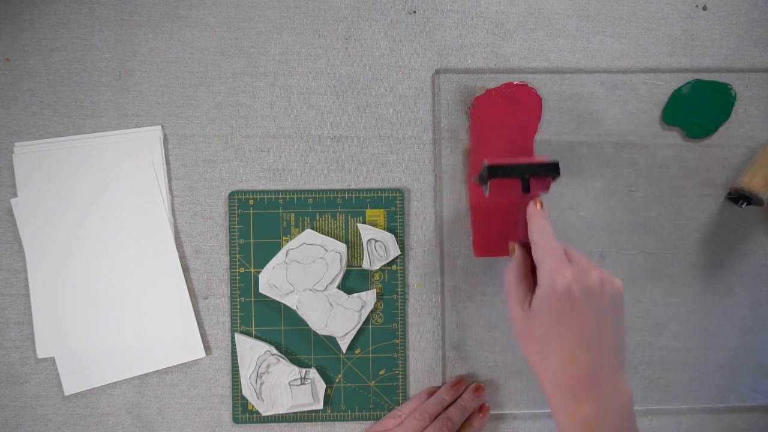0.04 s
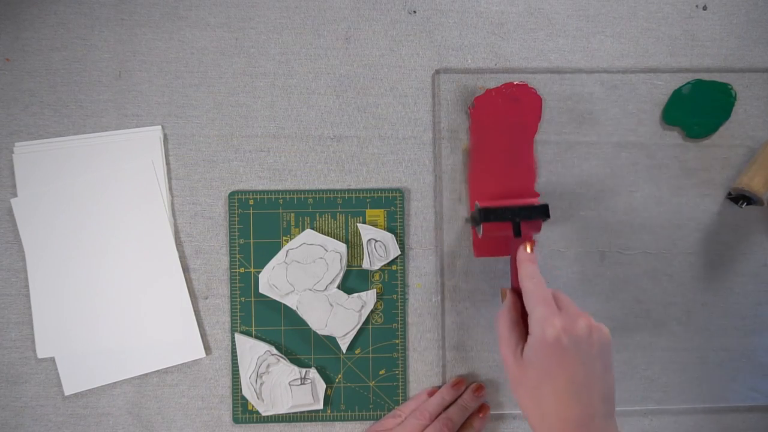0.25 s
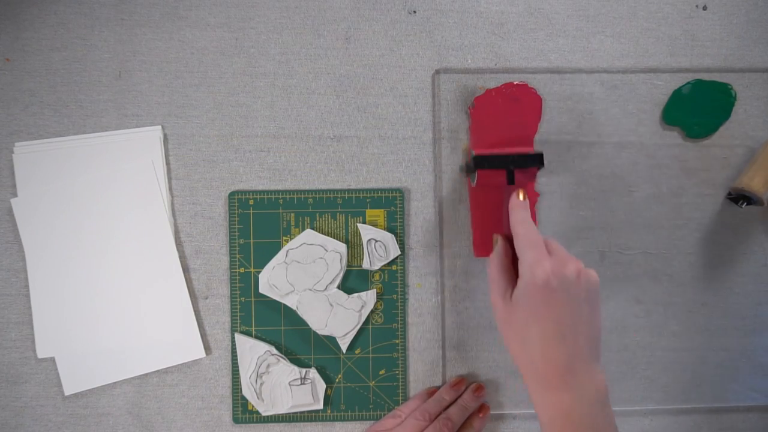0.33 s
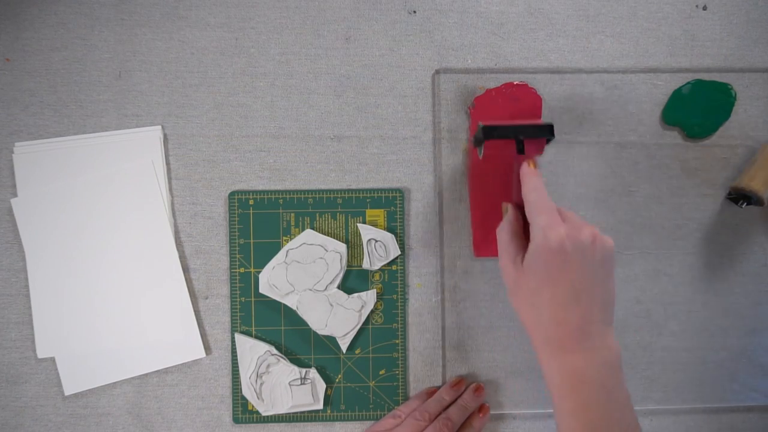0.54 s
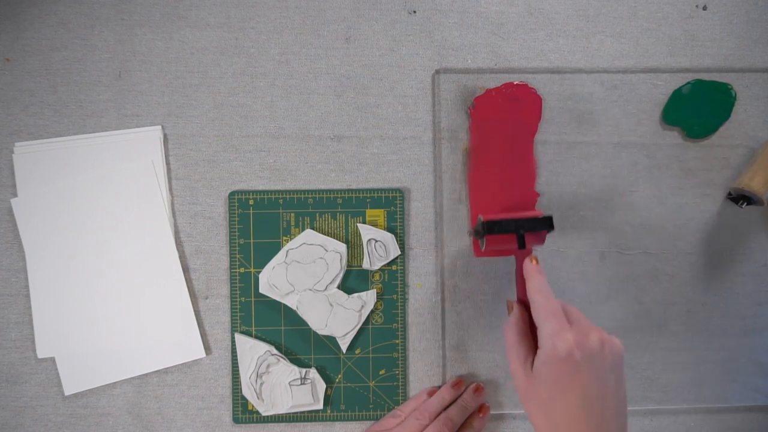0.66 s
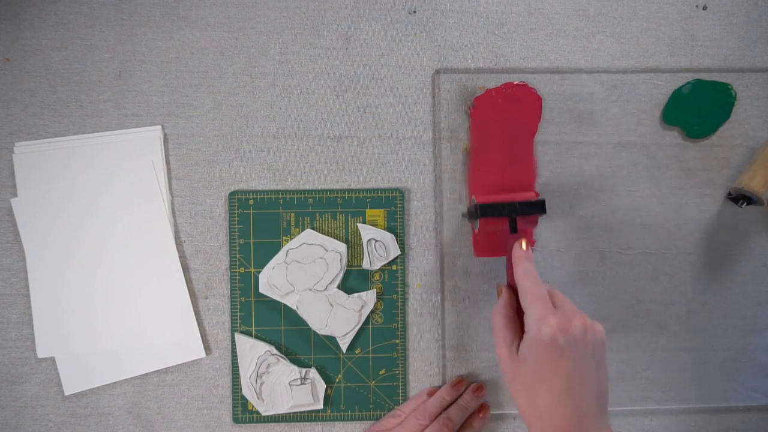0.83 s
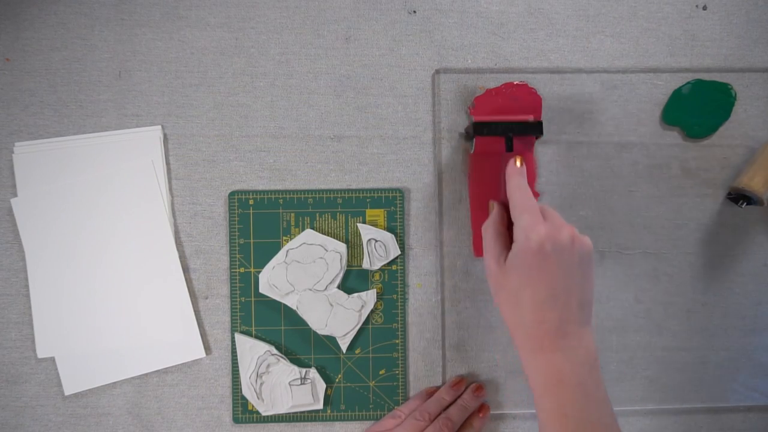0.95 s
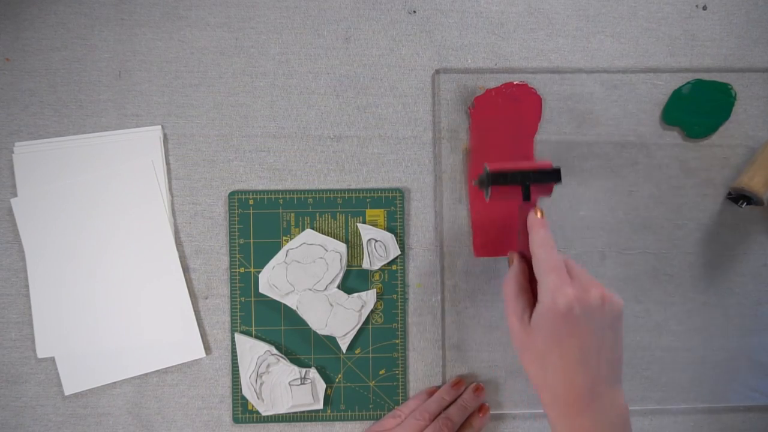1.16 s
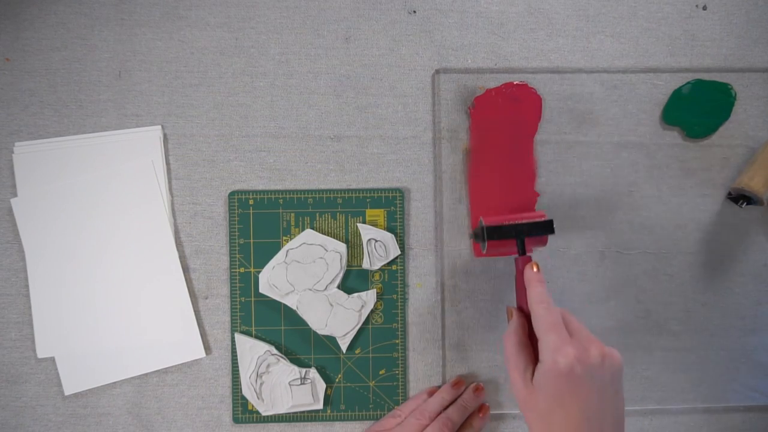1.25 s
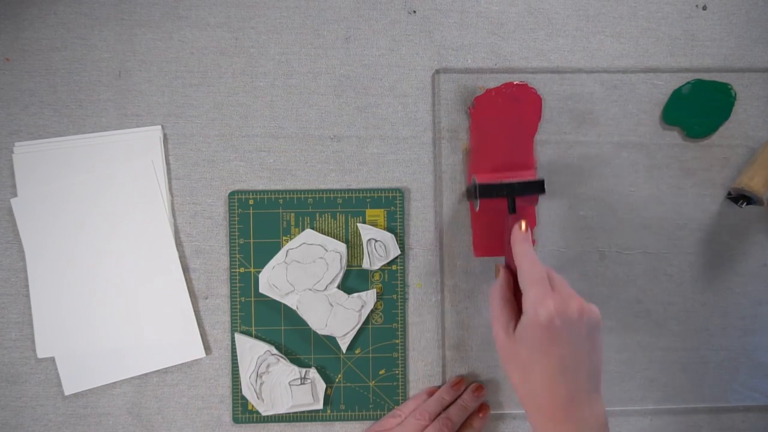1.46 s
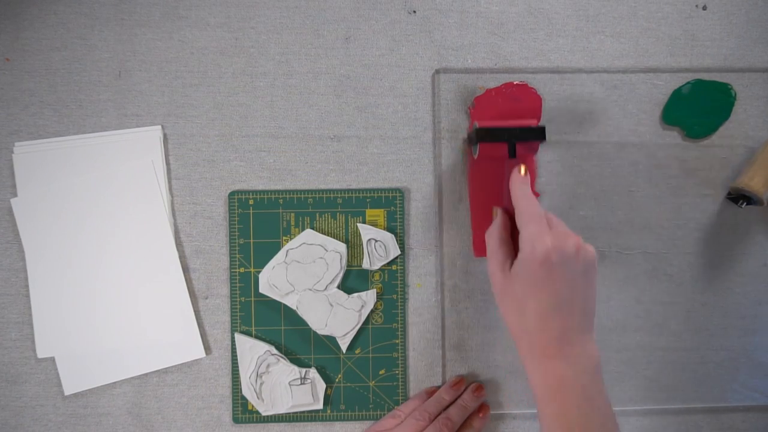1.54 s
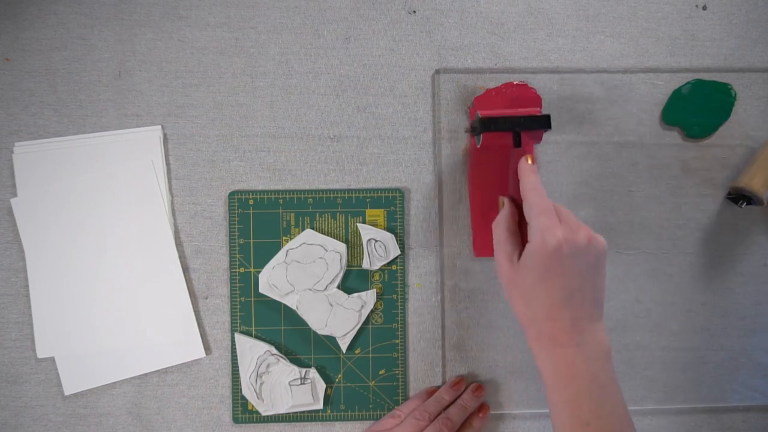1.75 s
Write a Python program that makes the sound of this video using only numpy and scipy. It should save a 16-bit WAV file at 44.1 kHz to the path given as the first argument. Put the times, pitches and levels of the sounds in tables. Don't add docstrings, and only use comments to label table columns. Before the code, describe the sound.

Three loud roller clacks with low table thuds, then short tacky ink crackle, in a quiet room.

```python
import sys
import numpy as np
from scipy import signal
from scipy.fft import rfft, irfft, next_fast_len
from scipy.io import wavfile
from scipy.ndimage import map_coordinates

SR = 44100
rng = np.random.default_rng(int(sys.argv[2]) if len(sys.argv) > 2 else 0)


def unload_wav(signal):
    wavfile.write(
        sys.argv[1],
        SR,
        np.round(np.clip(np.atleast_2d(signal).T, -1, 1) * 32767).astype(np.int16),
    )


def volts(x):
    e = np.asarray(x, float) / 20
    return 10 ** e


N = 79380
T = np.arange(N) / SR

# pitch_hz [Hz], level_db [dB]
AIR_SPECTRUM = [(25, -4), (52, 5), (65, 5.5), (85, -4), (260, -3), (335, -8.5), (1100, -18.5),
                (15400, -40.5)]
# pitch_hz [Hz], t60_s [s]
ROOM_DECAY = [(100, 0.067), (500, 0.5), (2000, 0.46), (6000, 0.4), (14000, 0.26)]
# pitch_hz [Hz], level_db [dB]
ROOM_COLOUR = [(100, -6), (500, -1), (2000, -3.5), (6000, -1.5), (14000, -9.5)]
# centre_s [s], half_length_s [s], level_db [dB]
SWISHES = [
    (0.123, 0.034, -59),
    (0.672, 0.034, -58),
    (1.248, 0.041, -55.5),
    (1.8, 0.023, -78.5),
]
# pitch_hz [Hz], level_db [dB]
CLOTH_SPECTRUM = [(470, -57.5), (800, -16.5), (970, -6.5), (1630, -13), (3410, -13), (12000, -26.5),
                  (15600, -61), (22000, -120)]
# centre_s [s], half_length_s [s], pitch_hz [Hz], width_hz [Hz], level_db [dB]
SQUEAK = (1.222, .011, 3350, 170, -59)
# start_s [s], thud_db [dB], push_s (softness of the push) [s], echo_db [dB], clack_db [dB]
LANDINGS = [
    (.2019, -11.5, 0.00052, 14, 0.5),
    (.7531, -22.5, .001, 13, -0.5),
    (1.3646, -15.5, 0.00049, 10, 0.5),
]
# pitch_hz [Hz], t60_s [s], level_db at each of three landing places [dB]
TABLE_MODES = [(80, 0.54, -9.5, -2, -9), (99.6, 0.5, -16.5, -2, -15.5), (137.5, 0.21, -3.5, 1.5, -15),
               (169, 0.17, 1.5, 6.5, -4), (212.3, 0.11, 0.5, -2, -3), (257.5, 0.32, -14, -9.5, -7.5),
               (299.2, 0.18, -18, -5.5, -2.5), (351, 0.085, -17.5, -3.5, 8.5), (378.7, 0.053, 3.5, 1, -24),
               (433.7, 0.09, 0.5, 1, -27), (517, 0.073, -5, 2, -24), (598.6, 0.2, -15, -8.5, -20.5),
               (658, 0.09, -60, -8, -8), (756, 0.015, -5, -23, -33)]
# pitch_hz [Hz], level_db [dB]
BOOMS = [
    [(60, -35.5), (150, -7), (300, -14), (480, 5), (640, -0.5), (760, -22.5), (1200, -59.5)],
    [(60, -29), (100, -8), (250, -14), (480, 17.5), (660, -6.5), (800, -27), (1200, -61)],
    [(60, -29), (100, -4), (200, -6), (300, -9), (450, -15), (760, -1), (1200, -62)],
]
# start_s [s], level_db [dB]
KNOCKS = [
    [(.2036, -1), (.20396, -4), (.20432, -7), (.2053, -13), (.2060, -7), (.2067, -14)],
    [(.7553, -2), (.7560, -7), (.7569, -1), (.7575, -5), (.7583, -9), (.7590, -9), (.7595, -7)],
    [(1.3671, -1), (1.36746, -4), (1.36782, -7), (1.3690, -14), (1.3703, -13), (1.3717, -18)],
]
# pitch_hz [Hz], width_hz [Hz], level_db at each landing [dB]
FRAME_MODES = [(4500, 370, -9, -15, -26), (5250, 620, -10, -5, 1), (5766, 440, -7.5, -4, 4),
               (6510, 510, -18, -7.5, -1), (6720, 190, -18.5, -5.5, 0.5), (8055, 470, 0, -4.5, 6.5),
               (8450, 500, -1.5, -3.5, 2.5), (9070, 480, -8.5, -5.5, 6), (10660, 610, -15.5, -11.5, -2),
               (12310, 3600, -18, -10.5, -1.5), (12500, 900, -15.5, -16.5, 5.5),
               (13350, 700, -13, -17.5, -9), (15300, 600, -16.5, -20, -4)]
# delay_s [s], level_db [dB]
WALLS = [(.0035, -28), (.007, -24), (0.0118, -28.5), (0.018, -32.5)]
# pitch_hz [Hz], width_hz [Hz], level_db [dB]
HANDLE_MODES = [
    [(900, 200, -24), (1300, 220, -2), (1500, 150, 2), (1923, 203.6, -2.5), (2300, 130, -8),
     (3020, 360, -5.5), (3900, 500, -26)],
    [(1500, 80, 2), (2006, 180, -6), (2640, 250, -8.5), (3550, 380, -5.5), (3790, 270, -0.5),
     (4180, 350, -6.5)],
    [(1280, 75, -3), (1600, 73, 3.5), (1843, 160, -1), (2450, 230, -3.5), (2900, 540, -5), (3320, 130, -10),
     (4000, 290, -13)],
]
HANDLE_DB = [-8.5, -3, -9]
# pitch_hz [Hz], level_db [dB]
ECHOES = [
    [(530, -38), (900, 3), (1100, -6), (1260, -10.5), (1450, -5), (3060, -15.5), (8680, -6), (14200, -15.5),
     (15800, -41)],
    [(530, -42), (900, -14), (1740, -6.5), (2240, -14.5), (4280, -3.5), (4710, -3.5), (7600, -13),
     (9100, -3.5), (15800, -22)],
    [(530, -42.5), (1760, -2.5), (2270, -18.5), (2880, -15), (5120, -4.5), (7160, -9.5), (8600, -1.5),
     (11500, -9.5), (15800, -25)],
]
# start_s [s], level_db [dB], landing place [index]
BUMPS = [(.226, -24, 0), (.286, -32, 0), (.332, -38, 0), (.797, -33, 1), (.838, -37, 1), (.885, -42, 1),
         (1.398, -28, 2), (1.42, -32, 2), (1.444, -36, 2), (1.493, -34, 2)]
# touch_s [s], full_speed_s [s], slowing_s [s], lifted_s [s], level_db [dB]
STROKES = [
    (0.318, 0.39, 0.48, 0.49, -46.5),
    (0.874, 0.989, 1.04, 1.067, -45.5),
    (1.455, 1.576, 1.66, 1.66, -46.5),
]
# pitch_hz [Hz], level_db [dB]
INK_SPECTRUM = [(1180, -34), (2000, -8.5), (2960, -11), (4610, -8), (7000, -6), (7980, 1.5), (10500, -6),
                (13800, 3.5), (16000, -4)]
# pitch_hz [Hz], level_db [dB]
RUMBLE_SPECTRUM = [(24, 2), (40, -16), (242, 0.5), (389, -17), (498, -20.5), (1440, -21.5), (2000, -27.5),
                   (2600, -70), (4400, -120)]
# start_s [s], level_db [dB], pitch_hz [Hz], width_hz [Hz], thump_db [dB]
TICKS = [(0.323, -35, 13550, 4060, -72), (0.342, -46, 13000, 5900, -81), (0.489, -47, 1500, 900, -63),
         (0.4939, -34.5, 4800, 3400, -35.5), (.4938, -32, 1800, 1500, -73.5),
         (0.497, -30.5, 2000, 1395, -75), (0.5008, -43.5, 2000, 1200, -66.5),
         (0.5013, -46, 4760, 2510, -65), (.500, -42, 13600, 4970, -58), (0.5067, -40.5, 1305, 196, -37.5),
         (0.5059, -27, 3100, 1897, -64), (.5105, -38, 2900, 1500, -71), (0.508, -34, 1510, 350, -76),
         (0.5067, -46, 930, 297, -73), (0.5452, -42, 1300, 1090, -39), (0.552, -45, 840, 500, -70),
         (1.0762, -35, 2300, 2600, -36.5), (1.077, -38.5, 5960, 5030, -73), (1.1081, -45, 8140, 2506, -42),
         (1.107, -48, 12500, 2030, -80), (1.107, -37, 805, 583, -43.5), (1.128, -51.5, 596, 500, -55.5),
         (1.157, -48.5, 610, 496, -76), (1.671, -58, 14000, 4830, -55.5), (1.681, -51, 13000, 5000, -56.5),
         (1.671, -42, 7500, 4000, -72), (1.681, -44, 7500, 4500, -73), (1.7032, -31, 8280, 900, -34),
         (1.7037, -38.5, 5930, 1600, -70), (1.704, -44.5, 4030, 600, -70),
         (1.7034, -31.5, 2600, 2200, -67.5), (1.707, -39, 3490, 3000, -70), (1.766, -52.5, 1500, 487, -70),
         (1.796, -50, 1500, 1200, -67), (1.7031, -42, 1370, 400, -73.5), (1.74, -49, 1170, 884, -37.5),
         (1.7487, -42, 1750, 1100, -61), (1.75, -66, 4600, 1500, -70)]
# pitch_hz [Hz], t60_s [s], level_db [dB]
THUMP_MODES = [(67.6, 0.18, -30.5), (111, 0.071, 6.5), (163.2, 0.21, -5.5), (249.7, 0.29, -11.5),
               (415, 0.18, -20.5)]


def unit(x):
    return x / np.sqrt(np.mean(x ** 2) + 1e-20)


def along(points, hz):
    f, v = np.transpose(points)
    return np.interp(np.log(hz + 1), np.log(f + 1), v)


def filtered(x, response):
    m = next_fast_len(len(x) + 8192)
    return irfft(rfft(x, m) * response(np.fft.rfftfreq(m, 1 / SR)), m)[:len(x)]


def peak(f, hz, width_hz):
    return 1j * f * width_hz / (hz * hz - f * f + 1j * f * width_hz)


def modal_response(modes):
    return lambda f: sum((-1) ** i * volts(db) * peak(f, hz, w) for i, (hz, w, db) in enumerate(modes))


def coloured(x, spectrum):
    return unit(filtered(x, lambda f: volts(along(spectrum, f))))


def wobble(rate):
    return map_coordinates(rng.standard_normal(int(N * rate / SR) + 4), [T * rate])


def bell(centre_s, half_s):
    return np.exp(-.5 * ((T - centre_s) / half_s) ** 2)


def add(track, s, x):
    part = track[round(s * SR):][:len(x)]
    part += x[:len(part)]


def room(x, wet_db=0, colour=ROOM_COLOUR):
    early_db, early_s, gap_s = 7.5, 0.006, .004
    hz, t, z = signal.stft(rng.standard_normal(SR // 2), SR, nperseg=256)
    decay_db = early_db * np.exp(-t / early_s) - 60 * t / along(ROOM_DECAY, hz)[:, None]
    tail = signal.istft(z * volts(decay_db), SR, nperseg=256)[1]
    tail = filtered(tail / np.linalg.norm(tail), lambda f: volts(along(colour, f) + wet_db))
    return signal.fftconvolve(x, np.pad(tail, (round(gap_s * SR), 0)))


def air():
    whine = unit(filtered(rng.standard_normal(N), lambda f: peak(f, 15700, 220) ** 2))
    tone = volts(-50 + 0.55 * wobble(14)) * coloured(rng.standard_normal(N), AIR_SPECTRUM)
    return tone + volts(-77) * whine


def sleeve():
    envelope = sum(volts(db) * bell(s, half) for s, half, db in SWISHES)
    swish = coloured(rng.standard_normal(N), CLOTH_SPECTRUM) * volts(0.6 * wobble(9.5)) * envelope
    s, half, hz, w, db = SQUEAK
    squeak = unit(filtered(rng.standard_normal(N), lambda f: peak(f, hz, w) ** 2))
    return swish + volts(db) * bell(s, half) * squeak


def thud(modes, push_s):
    waver_rad, waver_s, low_hz = 1.3, .07, 62.6
    t = np.arange(SR // 2) / SR
    knots = rng.standard_normal((len(modes), 40))
    where = np.broadcast_arrays(np.arange(len(modes))[:, None], t * 60)
    drift = map_coordinates(knots, where, order=1)
    growth = waver_rad * np.minimum(t / waver_s, 1)
    ring = np.zeros(len(t))
    for (hz, t60, db), wander in zip(modes, drift):
        ring += volts(db - 60 * t / t60) * np.sin(2 * np.pi * hz * t + growth * wander)
    return filtered(ring * (1 - np.exp(-t / push_s)), lambda f: (1j * f / (low_hz + 1j * f)) ** 2)


def frame_knock(place):
    scuff_s, scuff_db, spread_db = 0.0004, -15, 1.5
    t = np.arange(SR // 20) / SR
    blow = (t == 0) + volts(scuff_db) * rng.standard_normal(len(t)) * np.exp(-t / scuff_s)
    scatter_db = spread_db * rng.standard_normal(len(FRAME_MODES))
    modes = [(hz, w, db[place] + extra) for (hz, w, *db), extra in zip(FRAME_MODES, scatter_db)]
    ring = filtered(blow, modal_response(modes))
    return ring / np.abs(ring).max()


def handle(place):
    impulse = 1. * (np.arange(SR // 20) == 0)
    ring = filtered(impulse, modal_response(HANDLE_MODES[place]))
    return ring / np.abs(ring).max()


def landings():
    out = np.zeros(N)
    for k, (s, thud_db, push_s, echo_db, clack_db) in enumerate(LANDINGS):
        modes = [(hz, t60, db[k]) for hz, t60, *db in TABLE_MODES]
        low = volts(thud_db) * thud(modes, push_s)
        add(out, s, low)
        add(out, s, room(low, -6))
        add(out, s, room(np.ones(1), thud_db + 24.5, BOOMS[k]))
        for at, db in KNOCKS[k]:
            ring = frame_knock(k)
            for delay, wall_db in [(0, 0.002), *WALLS]:
                add(out, at + delay, volts(db + clack_db + wall_db) * ring)
        first_knock_s = KNOCKS[k][0][0]
        add(out, first_knock_s, volts(HANDLE_DB[k]) * handle(k))
        add(out, first_knock_s, room(np.ones(1), echo_db, ECHOES[k]))
    return out


def bumps():
    gain_db, spread_db, damp, push_s = 0.5, 4, 0.54, 0.0024
    out = np.zeros(N)
    for s, db, k in BUMPS:
        mix_db = spread_db * rng.standard_normal(len(TABLE_MODES))
        modes = [(hz, damp * t60, lv[k] + m) for (hz, t60, *lv), m in zip(TABLE_MODES, mix_db)]
        add(out, s, volts(db + gain_db) * thud(modes, push_s))
    return out


def rolling():
    threads_per_s, thread_spread_db, quiet_db = 17000, 1, 19.5
    sparse = .7
    rumble_db, linger_s = 0.5, 0.046
    speed_db, heavy = np.full(N, -120.5), np.zeros(N)
    for touch, full_speed, slowing, lifted, db in STROKES:
        ramp_db = np.interp(T, [touch, full_speed, slowing, lifted], [-quiet_db, 0, 0, -quiet_db])
        speed_db += (db + 121 + ramp_db) * (T > touch) * (T < lifted)
        heavy += volts(db) * np.interp(T, [touch, full_speed, lifted, lifted + linger_s], [0, 1, 1, 0])

    density = volts(2 * sparse * (speed_db - speed_db.max()))
    chance = rng.random(N) < density * threads_per_s / SR
    snaps = chance * rng.standard_normal(N)
    snaps = snaps * volts(thread_spread_db * rng.standard_normal(N) + (1 - sparse) * speed_db)
    full = volts(speed_db.max()) / np.sqrt(np.mean(snaps[density > .7] ** 2) / np.mean(snaps ** 2))
    fizz = coloured(snaps, INK_SPECTRUM) * full * volts(.8 * wobble(60))

    rumble = coloured(rng.standard_normal(N), RUMBLE_SPECTRUM) * volts(rumble_db) * heavy
    rumble = rumble * volts(1.5 * wobble(40))
    return fizz + room(fizz, -6)[:N] + rumble


def ticks():
    burst_s, snap, thump_lag_s, thump_push_s = .001, 4, 0.00311, 0.00023
    out, t = np.zeros(N), np.arange(SR // 20) / SR
    for s, db, hz, w, thump_db in TICKS:
        contact = snap * (t == 0) + rng.standard_normal(len(t)) * np.exp(-t / burst_s)
        burst = filtered(contact, lambda f: peak(f, hz, w) * peak(f, hz, 2 * w))
        add(out, s, volts(db) * burst / np.abs(burst).max())
        add(out, s + thump_lag_s, volts(thump_db) * thud(THUMP_MODES, thump_push_s))
    return out + room(out, -8)[:N]


def scene():
    return (landings() + rolling() + ticks() + sleeve() + air() + bumps())[None]


def band_limit(x):
    return signal.sosfilt(signal.butter(12, 16520, fs=SR, output="sos"), x)


def record(dry):
    ceiling, knee, top_hz = 1.11, 3.2, 15850
    x = dry[0] / (1 + np.abs(dry[0] / ceiling) ** knee) ** (1 / knee)
    x = filtered(x, lambda f: 1 / (1 + (f / top_hz) ** 200))
    return band_limit(x[None])


dry = scene()
out = record(dry)
unload_wav(out)
```